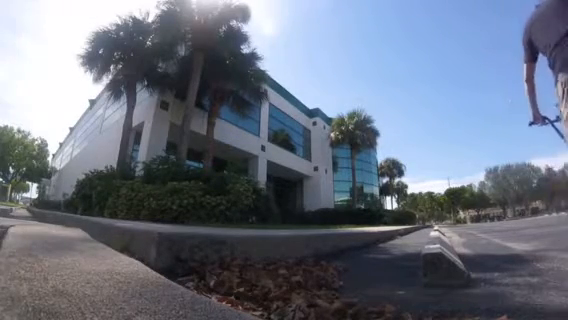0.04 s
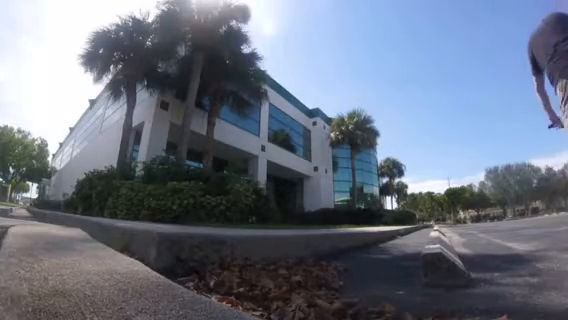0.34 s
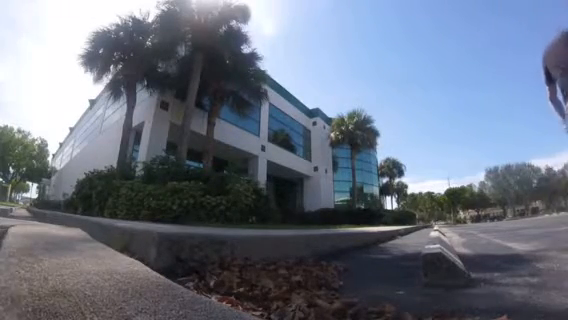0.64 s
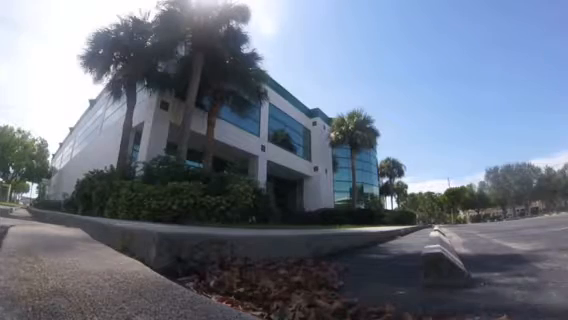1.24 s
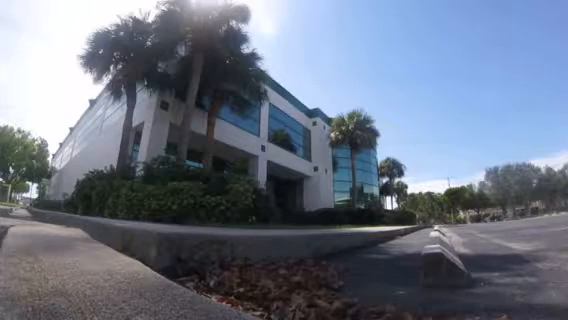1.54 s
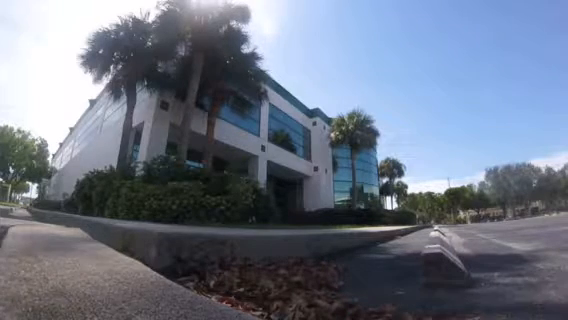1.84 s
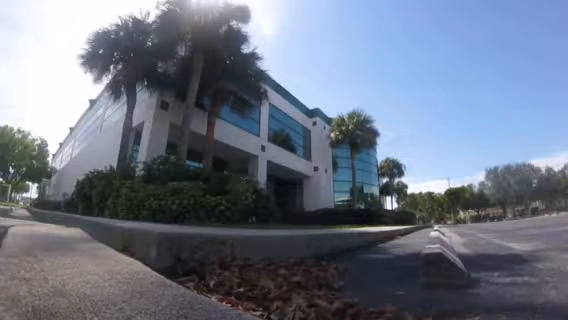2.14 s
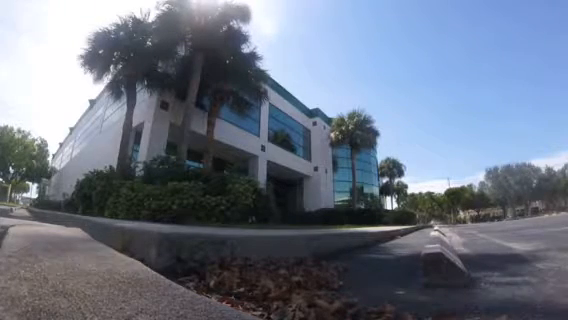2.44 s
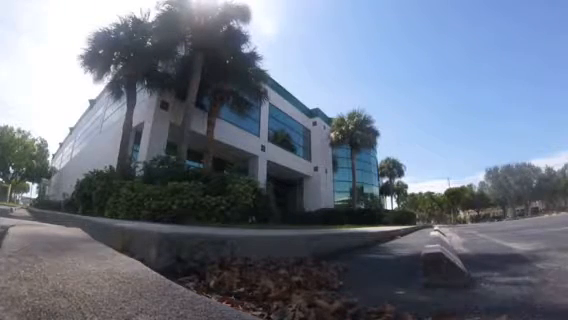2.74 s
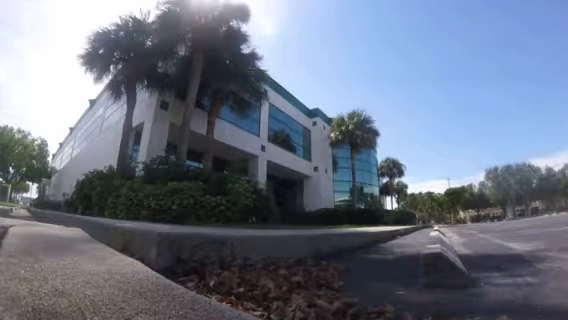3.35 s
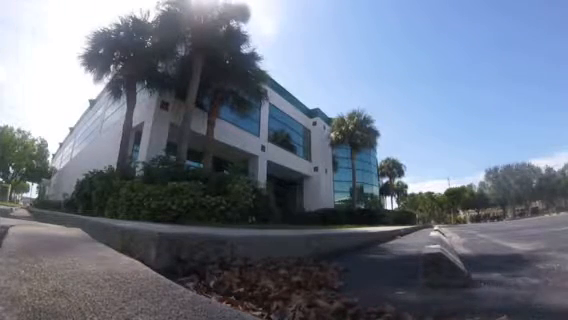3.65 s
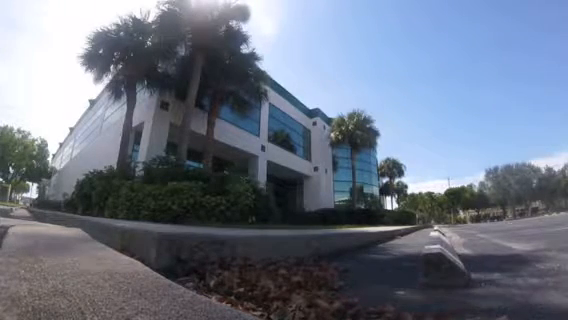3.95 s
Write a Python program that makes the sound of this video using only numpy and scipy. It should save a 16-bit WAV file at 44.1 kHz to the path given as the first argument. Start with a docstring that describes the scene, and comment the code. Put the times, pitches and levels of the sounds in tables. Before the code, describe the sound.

A steady low rumble of far traffic, with a few small knocks and rising wind gusts.

```python
"""Breezy parking lot

Distant engines rumble, a passing vehicle drones and tyres rush; a far bird chirps once, faintly repeated.
Nearby come a few dry ticks, a gritty scuff and hollow knocks ringing in low, well-damped modes.
Halfway through, a breeze rises and buffets the microphone, whose port adds a narrow resonance to the hiss.
"""
import sys
import numpy as np
from scipy.fft import rfft, irfft, next_fast_len
from scipy.io import wavfile
from scipy.ndimage import uniform_filter1d, map_coordinates

SR = 44100
rng = np.random.default_rng(int(sys.argv[2]) if len(sys.argv) > 2 else 0)


def inscribe(sig):
    """Save sig as 16-bit PCM at rate SR to the path in sys.argv[1].

    A 1-D sig is mono; a 2-D sig holds one channel per row.
    Samples are clipped to [-1, 1] before scaling.
    """
    pcm = np.round(np.clip(np.atleast_2d(sig).T, -1, 1) * 32767)
    wavfile.write(sys.argv[1], SR, pcm.astype(np.int16))


N = 176400
T = np.arange(N) / SR


def amp(db):
    """Decibels to gain."""
    return 10 ** (np.asarray(db) / 20)


def unit(x):
    """Scale to rms 1."""
    return x / np.sqrt(np.mean(x ** 2) + 1e-20)


def filtered(x, response):
    """Filter x by a gain given as a function of frequency in Hz."""
    size = next_fast_len(N + 8192)
    return irfft(rfft(x, size) * response(np.fft.rfftfreq(size, 1 / SR)), size)[:N]


def noise(spectrum):
    """Noise of rms 1, coloured by an EQ curve of (f/Hz, level/dB) points."""
    f, db = np.transpose(spectrum)
    white = rng.standard_normal(N)
    return unit(filtered(white, lambda hz: amp(np.interp(np.log(hz + 1), np.log(f), db))))


def fader(points):
    """A level ride in dB through (t/s, level/dB) points."""
    return np.interp(T, *np.transpose(points))


def wobble(rate):
    """A smooth random curve with `rate` knots a second."""
    return map_coordinates(rng.standard_normal(400), [T * rate], mode="mirror")


def even(x, seconds):
    """Level out swells slower than `seconds` by dividing by the running rms."""
    power = uniform_filter1d(x * x, max(int(seconds * SR), 2))
    return x / np.sqrt(np.abs(power) + 1e-6)


def hiss():
    """A steady bed of hiss, plus the narrow band that rings in the microphone port."""
    # hiss colour: f/Hz, level/dB
    hiss_eq = [(1000, 6.5), (3500, 2), (5200, -2.5), (7300, 4.5), (9200, 1), (10300, -9.5), (11500, -3.5),
               (13000, -7.5), (14000, -38)]
    port_hz, width_hz = 6500, 320
    resonance = lambda hz: 1j * hz * width_hz / (port_hz ** 2 - hz * hz + 1j * hz * width_hz)
    port = unit(filtered(rng.standard_normal(N), resonance))
    return amp(-65) * noise(hiss_eq) + amp(-67.5) * port


def traffic():
    """Far engines rumble, one passing vehicle's drone swells and eases, and tyres give a wavering rush."""
    # colours of engine rumble, vehicle drone and tyre rush: f/Hz, level/dB
    rumble_eq = [(12, -27), (25, -6), (50, -2.5), (78, 2.5), (100, -3), (150, -5), (185, -13), (290, -14.5),
                 (380, -13), (520, -19.5), (900, -30.5), (3000, -89)]
    drone_eq = [(80, -62), (180, -5), (230, 0), (270, -7.5), (330, -16.5), (1500, -120)]
    tyre_eq = [(150, -45), (450, -8), (650, -2), (900, 1), (1150, 0), (1450, -6.5), (1900, -12),
               (2700, -17), (3800, -21.5), (4800, -28.5), (9000, -46)]
    # level rides of the drone and the tyres: t/s, level/dB
    drone_ride = [(0, -49), (.6, -46.5), (1.3, -46), (2.1, -47.5), (4, -49)]
    tyre_ride = [(0, -47.5), (.7, -47), (1.3, -48.5), (2.3, -48), (3.1, -49), (4, -48.5)]
    engines = amp(-40.5 + 0.38 * wobble(4.93)) * even(noise(rumble_eq), seconds=0.21)
    drone = amp(fader(drone_ride)) * even(noise(drone_eq), seconds=0.15)
    tyres = amp(fader(tyre_ride) + 0.99 * wobble(9.63)) * noise(tyre_eq)
    return engines + drone + tyres


def bird():
    """A far bird's thin, fluttering whistles slide up to pitch, peak early and linger."""
    # the chirp and its faint repeat: t/s, length/s, level/dB
    chirps = [(0.147, 0.11, -59.5), (0.264, 0.078, -66)]
    pitch_hz, rise_hz, rise_s, flutter_db = 3635, 380, 0.015, 3
    out = np.zeros(N)
    for start, length, db in chirps:
        t = np.clip(T - start, 0, length)
        hz = pitch_hz - rise_hz * np.exp(-t / rise_s)
        envelope = amp(db + flutter_db * wobble(128.3)) * np.sin(np.pi * np.sqrt(t / length))
        out += envelope * np.sin(2 * np.pi * np.cumsum(hz) / SR)
    return out


def ticks():
    """Light, dry contacts: tiny bursts of band-limited noise with no ring."""
    # contacts: t/s, level/dB, band centre/Hz, length/s, treble roll-off/Hz
    contacts = [(0.809, -37, 970, 0.0028, 4170), (1, -52.5, 2300, 0.004, 4300),
                (2.629, -49, 3700, 0.0041, 3870), (3.182, -48.5, 2100, 0.0038, 3900)]
    half_width_octaves = 0.85
    out = np.zeros(N)
    for at, db, centre_hz, length, top_hz in contacts:
        bell = lambda hz: 1 / (1 + (np.log2((hz + 1) / centre_hz) / half_width_octaves) ** 2)
        colour = lambda hz: bell(hz) / (1 + (hz / top_hz) ** 10)
        band = unit(filtered(rng.standard_normal(N), colour))
        out += amp(db) * even(band, length) * np.exp(-2 * ((T - at) / length) ** 2)
    return out


def scuff():
    """A short, gritty scrape that swells and fades."""
    # scraping stroke: t/s, length/s, level/dB
    strokes = [(1.825, 0.015, -45)]
    # scrape colour: f/Hz, level/dB
    scrape_eq = [(250, -11), (700, 10.5), (1400, -5), (2200, -4), (3700, -9.5), (4700, -18), (6300, -12),
                 (8000, -35)]
    envelope = sum(amp(db) * np.exp(-2 * ((T - at) / length) ** 2) for at, length, db in strokes)
    grit = amp(2 * wobble(300))
    return envelope * grit * noise(scrape_eq)


def knocks():
    """A small crack starts a few low, well-damped modes; lower knocks are softer and crack less."""
    # hits: t/s, level/dB, pitch/ratio to the modes
    hits = [(0.811, -34, .5), (1.366, -35.5, 0.6), (1.634, -26.5, 0.96)]
    # modes of the hollow body: f/Hz, level/dB, t60/s
    modes = [(354, -7, 0.031), (430, 5, 0.027), (623, 2.5, 0.026), (800, -2, .02)]
    # crack colour: f/Hz, level/dB
    crack_eq = [(300, -10), (1500, 2), (3000, 5), (4800, 1), (6500, -1), (9000, -12), (12000, -40)]
    attack_s, crack_t60_s = 0.001, 0.009
    snap = even(noise(crack_eq), seconds=0.001)
    out = np.zeros(N)
    for start, level, pitch in hits:
        t = np.maximum(T - start, 0)
        ring = sum(amp(db - 60 * t / t60) * np.sin(2 * np.pi * pitch * hz * t) for hz, db, t60 in modes)
        attack = 1 - np.exp(-t / attack_s)
        crack = pitch ** 2 * snap * amp(-19 - 60 * t / crack_t60_s) * (t > 0)
        out += amp(level) * (ring * attack + crack)
    return out


def wind():
    """Breeze and gusts push on the microphone; stronger flow sheds finer, brighter eddies."""
    # level ride of the breeze: t/s, level/dB
    breeze_ride = [(0, -65), (1.85, -42.5), (2.1, -36.5), (2.3, -31.5), (2.62, -30), (2.76, -36),
                   (3.1, -37.5), (3.45, -35.5), (3.8, -33.5), (4, -37)]
    # gusts: peak t/s, length/s, level/dB
    gusts = [(2.88, 0.092, -25), (3.138, 0.029, -24.5), (3.272, 0.037, -26), (3.306, 0.033, -25.5),
             (3.389, 0.027, -21), (3.416, 0.012, -19), (3.47, 0.041, -29), (3.538, 0.021, -25),
             (3.661, 0.04, -21.5), (3.727, 0.043, -26), (3.905, 0.013, -26)]
    # colours of the low buffeting and the finer eddies: f/Hz, level/dB
    buffet_eq = [(10, -20), (25, -7.5), (42, 3), (62, 0.5), (115, -7.5), (180, -16.5), (250, -26),
                 (400, -44), (2000, -110)]
    eddy_eq = [(60, -30), (170, 0), (380, -8), (580, -16.5), (900, -20.5), (2000, -57), (6000, -90)]
    strong_flow_db, eddy_growth = -24.5, 2.6  # eddies gain 2.6 dB per dB of flow
    power = amp(fader(breeze_ride)) ** 2
    for at, length, db in gusts:
        power += amp(db) ** 2 * np.exp(-(2 * (T - at) / length) ** 2)
    flow = np.sqrt(power)
    eddies = amp(-42) * (flow / amp(strong_flow_db)) ** eddy_growth * noise(eddy_eq)
    buffeting = flow * even(noise(buffet_eq), seconds=0.041)
    return buffeting + eddies


def scene():
    """All layers mixed to mono at one microphone."""
    return (traffic() + hiss() + wind() + ticks() + scuff() + knocks() + bird())[None]


def record(dry):
    """A brick-wall low-pass takes off the very top."""
    cutoff_hz = 14320
    return filtered(dry[0], lambda hz: hz < cutoff_hz)[None]


dry = scene()
out = record(dry)
inscribe(out)
```